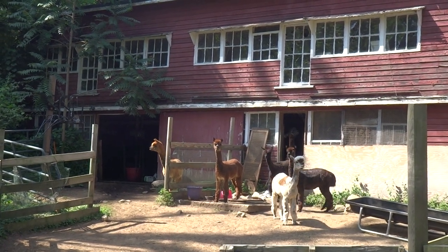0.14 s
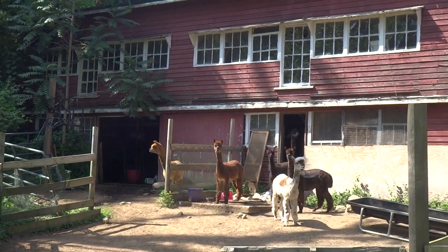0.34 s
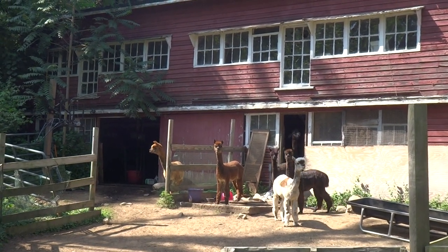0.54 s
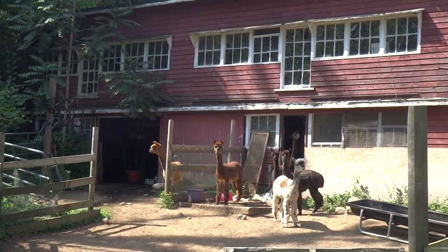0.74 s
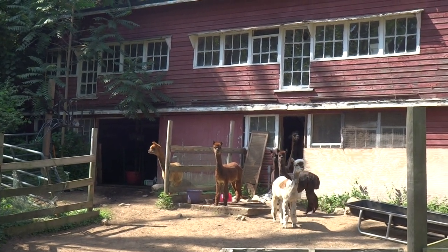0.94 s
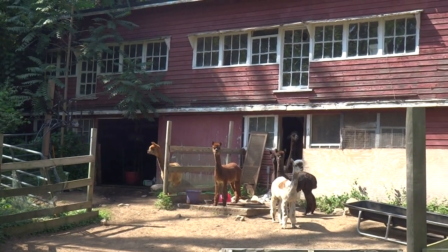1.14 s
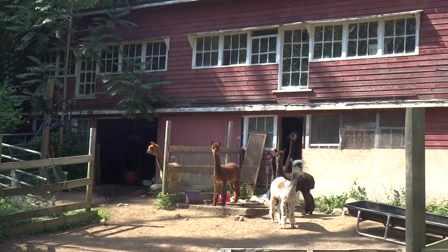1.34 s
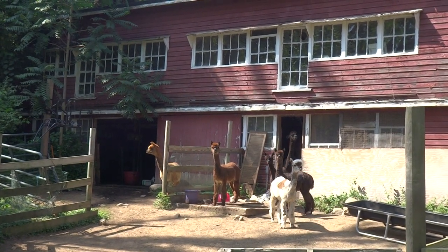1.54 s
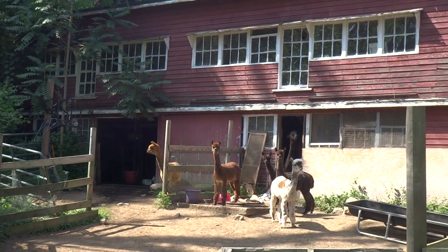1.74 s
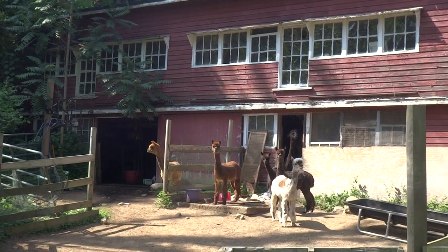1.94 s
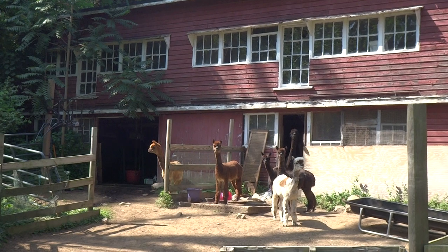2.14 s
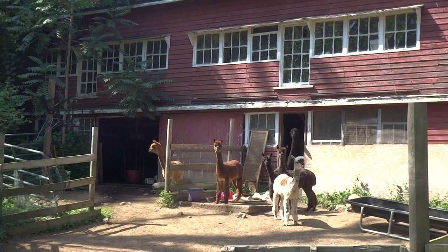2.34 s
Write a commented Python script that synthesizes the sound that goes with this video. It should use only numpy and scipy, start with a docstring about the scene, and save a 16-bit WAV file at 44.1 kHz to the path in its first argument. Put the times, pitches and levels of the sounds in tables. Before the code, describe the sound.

An alpaca's alarm calls start after a faint squeal at 0 seconds. Harsh whistling honks, each about a tenth of a second, come near 0.2, 0.4, 0.65, 0.9, 1.15, 1.4 and 1.7; the 0.4 one is broken, raspy and clicking. Thin higher squeals fill most gaps. From 1.7 the honks weaken, with low buzzy ones at 1.9 and 2.25. Barn echoes, faint insect hiss and distant machinery hum continue throughout.

```python
"""An alpaca gives alarm calls four times a second in a yard walled by a barn. Each honk is a low harmonic buzz
of the vocal folds; most add a shrill whistle that the buzz modulates into sidebands, with pulsed breath noise.
Hard closures of the folds click in the throat, and a thin clean squeal sounds between the honks. The walls echo
it all by convolution over filtered-noise insects, far machinery and rumble, heard by two close microphone ports."""
import sys
import numpy as np
from scipy import signal
from scipy.fft import rfft, irfft
from scipy.io import wavfile
from scipy.ndimage import uniform_filter1d

SR = 44100
rng = np.random.default_rng(int(sys.argv[2]) if len(sys.argv) > 2 else 0)


def invert_db(level):
    """Linear amplitude ratio for a level in decibels (20 dB per decade), elementwise."""
    return 10 ** (np.asarray(level, dtype=float) / 20)


def file_out(sig):
    """Save sig as 16-bit WAV at sys.argv[1]."""
    # one column per channel
    cols = np.atleast_2d(sig).T
    # limit, then scale
    lim = np.clip(cols, -1, 1)
    pcm = np.round(lim * 32767).astype(np.int16)
    wavfile.write(sys.argv[1], SR, pcm)


N = 105840

# Honks: start t/s, length t/s, buzz level/dB, top pitch f/Hz, roughness [0-1], extra level of the lowest tone/dB
HONKS = [(.175, .155, -39.5, 431.1, 0.23, -1), (.395, 0.13, -35, 410.2, .75, 4.5),
         (.645, 0.13, -40, 426.5, 0.25, -0.5), (.895, 0.095, -38.5, 420.6, 0.21, -2),
         (1.145, 0.1, -38.5, 422.5, 0.01, -1), (1.42, 0.094, -37.5, 414.1, 0.19, 0.5),
         (1.7, 0.12, -38, 396.8, 0.2, 3.5), (1.89, 0.12, -38, 390, 0.29, -3),
         (2.235, 0.13, -39, 383, 0.23, -0.5)]
# Throat resonance on the buzz: f/Hz, relative level/dB
HONK_THROAT = [(390, -6), (780, -6.5), (1170, -8.5), (1550, -11.5), (1940, 5), (2330, -2), (2720, 1),
               (3500, -4.5), (4300, -10), (5100, -6.5), (5800, -46.5)]
# Whistle path, one list per whistling honk: t/s, pitch f/Hz, level/dB, brightness tilt/dB
WHISTLES = [
    [(.196, 1800, -30, 1), (.204, 1820, -23, -2), (.225, 1837, -17, 1), (.245, 1904, -21, 3.5),
     (.28, 1898, -19, 1), (.3, 1877, -18.5, 2.5), (.312, 1894, -57, 11)],
    [(.41, 1728, -39.5, -22.5), (.418, 1769, -28, 3.5), (.43, 1813, -47.5, 25.5), (.442, 1797, -32.5, 16),
     (.455, 1832, -28.5, 9), (.47, 1759, -34.5, -10.5), (.48, 1800, -41, -17), (.496, 1902, -31, -11.5),
     (.512, 1879, -38.5, -18.5), (.525, 1898, -64, -14.5)],
    [(.659, 1800, -35, 4), (.668, 1813, -18, 2), (.684, 1848, -15, -3.5), (.694, 1852, -20.5, 4),
     (.708, 1867, -20.5, 9.5), (.728, 1909, -18.5, -6), (.74, 1880, -28.5, 18)],
    [(.907, 1793, -27, 1), (.916, 1820, -18.5, 1.5), (.935, 1826, -15.5, -2), (.958, 1843, -20.5, 6.5),
     (.985, 1878, -27, 2)],
    [(1.162, 1800, -31.5, 5), (1.17, 1811, -17.5, 0), (1.19, 1818, -18.5, 0), (1.208, 1816, -18, 0.5),
     (1.213, 1843, -19, 1), (1.23, 1815, -53, 14)],
    [(1.436, 1800, -21, 2), (1.442, 1800, -29.5, -0.5), (1.46, 1800, -18.5, 2.5), (1.484, 1776, -28.5, -1)],
    [(1.73, 1779, -58, -13), (1.748, 1773, -31, -4.5), (1.765, 1777, -46, -6)],
]
# Modulation products: rows = multiples 1-4 of the whistle, columns = multiples -1..3 of the buzz [relative level/dB]
SIDEBANDS_DB = [(-24.5, -3.5, -10, -19, -16.5), (-51, -3, -6, -15, -18), (-19.5, -13.5, -15.5, -18.5, -25),
                (-61, -23.5, -29, -29.5, -47)]
# Breath noise spectrum: f/Hz, relative level/dB
BREATH_SPECTRUM = [(400, -11), (1200, -11), (1900, -3.5), (2800, 2.5), (3800, 3.5), (5400, 5), (7500, -15),
                   (9000, -13), (14500, -39.5)]
# Hard closures of the folds: t/s, peak level/dB, ring f/Hz
CATCHES = [(.4215, -22, 3700), (.4422, -13.5, 5400), (.469, -17, 3601), (.4947, -12, 4000),
           (.4995, -19.5, 4080), (1.7432, -25, 2600), (1.748, -18, 3600)]
# Squeals: start t/s, length t/s, level/dB, top pitch f/Hz, share of pitch lost at the start,
# extra level of the harmonics above the second/dB
SQUEALS = [(0.0, 0.165, -50, 602.7, .36, 3.5), (0.563, 0.094, -35, 545.4, 0.086, -30),
           (.8, 0.091, -31, 544.3, 0.0968, -17), (1.034, .08, -29, 555, 0.1017, -17.5),
           (1.271, 0.11, -38, 581.6, 0.0755, -5.5), (1.553, 0.13, -39.5, 592, 0.11, -2.5),
           (2.057, 0.13, -37, 607, 0.12, 1.5)]
# Throat resonance on the squeal: f/Hz, level/dB
SQUEAL_THROAT = [(600, -22.5), (1150, -18.5), (1800, -10), (2350, -17), (2700, -0.5), (3050, 2), (3600, -4),
                 (4200, -6), (4800, -9), (5400, -35)]
# Reflections from ground and barn walls: delay t/s, level/dB
ECHOES = [(0.01, -11.5), (0.025, -7), (0.046, -16)]
# Reverberant tail of the yard by band: centre f/Hz, t60/s, relative level/dB
YARD_TAIL = [(540, 3, -8), (1800, 2.2, -10), (3100, 1.7, -11.5), (6030, 0.6, -7.5), (9000, 0.38, -29)]
# Rumble and hiss spectrum: f/Hz, relative level/dB
AIR_SPECTRUM = [(22, -39), (40, -5.5), (55, -10), (120, -4), (170, -8), (300, -14), (600, -8.5),
                (1200, -15), (2000, -31.5), (3200, -23), (5000, -26), (8000, -13.5), (12000, -36),
                (15500, -52)]
# Insect song bands: centre f/Hz, width f/Hz, level/dB, flicker/dB
INSECTS = [(7810, 380, -52, 1), (10230, 630, -55.5, -1.5), (13900, 3000, -64, -3.5)]
# Far machinery: centre f/Hz, width f/Hz, level/dB
HUM = [(108.6, 5.5, -66.5), (133.9, 5.8, -61.5), (1080, 42, -59.5)]
# Gain of the part unlike at the ports, before each port's weight: f/Hz, level/dB
APART_DB = [(25, -24), (125, -13), (500, -13), (1000, -20), (8000, -13), (12000, -24)]
# Phase tilt between the ports, before halving and each port's weight: f/Hz, phase/rad
PORT_PHASE = [(60, 0.34), (125, -0.31), (340, -1.08), (950, -1.42), (2000, -0.97), (4650, -0.57),
              (15000, 0.66)]
# Level tilt between the ports, before halving and each port's weight: f/Hz, level/dB
PORT_DB = [(60, .2), (2000, -0.65), (8000, -0.2)]


def unit(x):
    """Normalisation: scale to rms 1."""
    return x / np.sqrt(np.mean(x ** 2))


def at(table, hz):
    """Interpolation of (f/Hz, value) points on a logarithmic frequency axis."""
    table = np.array(table, float)
    return np.interp(np.log(np.maximum(hz, 1)), np.log(table[:, 0]), table[:, 1])


def shaped(x, gain):
    """Linear filtering: multiply the spectrum by gain(f/Hz)."""
    spectrum = rfft(x) * gain(np.fft.rfftfreq(x.shape[-1], 1 / SR))
    return irfft(spectrum, x.shape[-1])


def bump(hz, centre_hz, width_hz):
    """Gaussian band-pass response."""
    return np.exp(-2 * ((hz - centre_hz) / width_hz) ** 2)


def walk(hz):
    """Low-passed noise: a random wander up to about hz, of rms 1."""
    return unit(shaped(rng.standard_normal(N), lambda f: bump(f, 0, hz)))


def column(rows, index):
    """Sample and hold: one value per call, kept until the next call starts."""
    starts = [row[0] for row in rows]
    call = np.searchsorted(starts, np.arange(N) / SR) - 1
    return np.array([row[index] for row in rows])[np.clip(call, 0, None)]


def arches(rows, rise, sag, top, edge_s):
    """Frequency and amplitude envelopes: pitch arches over each call; level rises, holds and falls."""
    t = np.arange(N) / SR
    hz = np.full(N, 1. * rows[0][3])
    gain = np.zeros(N)
    for row, lost in zip(rows, rise):
        start, length, db, pitch = row[:4]
        u = (t - start) / length  # place within the call, 0 to 1
        on = (u >= 0) & (u <= 1)
        bend_up = lost * ((top - u) / top) ** 2.2
        bend_down = sag * ((u - top) / (1 - top)) ** 2.5
        hz[on] = pitch * (1 - np.where(u < top, bend_up, bend_down)[on])
        to_edge_s = np.minimum(u, 1 - u)[on] * length
        gain[on] = invert_db(db) * np.sin(np.pi / 2 * np.clip(to_edge_s / edge_s, 0, 1)) ** 2
    return hz, gain


def fold_buzz(hz, phase):
    """Source-filter principle: harmonics of the vocal folds weighted by the throat, each flickering."""
    lowest_db = column(HONKS, index=5)
    low = np.zeros(N)
    for k in range(1, 16):
        level_db = at(HONK_THROAT, k * hz) + 1.5 * walk(25) + lowest_db * (k == 1)
        low += invert_db(level_db) * np.sin(k * phase)
    return unit(low)


def whistle_path():
    """Frequency and amplitude modulation: pitch, gain and brightness follow each whistle's points."""
    t = np.arange(N) / SR
    hz, gain, bright_db = np.full(N, 1800.), np.zeros(N), np.zeros(N)
    for call in map(np.array, WHISTLES):
        on = (t >= call[0, 0]) & (t <= call[-1, 0])
        hz[on] = np.interp(t[on], call[:, 0], call[:, 1])
        gain[on] = invert_db(np.interp(t[on], call[:, 0], call[:, 2]))
        bright_db[on] = np.interp(t[on], call[:, 0], call[:, 3])
    return hz, uniform_filter1d(gain, size=60), bright_db


def whistle(hz, bright_db, rough, buzz):
    """Intermodulation: the buzz chops the whistle, giving sum and difference tones."""
    break_db = 8  # how far the tones cut in and out at full roughness
    pipe = 2 * np.pi * np.cumsum(hz * (1 + 0.0207 * rough * walk(164))) / SR
    shrill = np.zeros(N)
    for m, row in enumerate(SIDEBANDS_DB):
        tilt_db = min(m - 1, 1) * bright_db  # sign: minus on the first multiple, plus on the third and fourth
        for k, db in enumerate(row):
            level_db = db + tilt_db + break_db * rough * walk(52.0)
            shrill += invert_db(level_db) * np.sin((m + 1) * pipe + (k - 1) * buzz + 0.19 * k * k)
    return unit(shrill)


def breath_noise(puff, rough):
    """Turbulence: pulsed noise in bands that cut in and out as the voice roughens."""
    patchy_db = 7  # at full roughness
    rasp = np.zeros(N)
    for centre_hz in 700 * 1.4 ** np.arange(10):
        band = shaped(puff, lambda f: invert_db(at(BREATH_SPECTRUM, f)) * bump(f, centre_hz, 0.36 * centre_hz))
        rasp += invert_db(patchy_db * rough * walk(31)) * band
    return unit(rasp)


def honks():
    """Modulation: the fold buzz modulates a whistle of its own pitch and gates the breath."""
    pitch_lost = [.15] * len(HONKS)  # share lost at the start
    hz, gain = arches(HONKS, pitch_lost, sag=.12, top=.45, edge_s=0.01)
    rough = np.clip(column(HONKS, index=4), 0, 1)
    clear = np.sqrt(1 - rough ** 2)
    buzz = 2 * np.pi * np.cumsum(hz * (1 + 0.0522 * rough * walk(216))) / SR
    low = fold_buzz(hz, buzz)
    high_hz, high, bright_db = whistle_path()
    shrill = whistle(high_hz, bright_db, rough, buzz)
    # One puff of breath per fold cycle; 1.5 sets how sharply it is gated
    puff = np.exp(1.5 * np.cos(buzz - 1)) * rng.standard_normal(N)
    rasp = breath_noise(puff, rough)
    # A rough honk rattles low in the throat
    rattle = unit(shaped(puff, lambda f: bump(f, 600, 1700) * (f > 300)))
    growl = invert_db(-3) * rough ** 3 * rattle
    # The buzz rings near 4310 Hz when the whistle sounds
    pressed = sum(bump(k * hz, 4310, 770) * np.sin(k * buzz + k * k) for k in range(7, 13))
    tones = clear * (shrill + invert_db(-11.5) * pressed)
    hiss = (invert_db(-17) + 0.35 * rough ** 3.3) * invert_db(bright_db) * rasp
    return gain * (clear * low + invert_db(-4) * rasp) + high * (tones + hiss + growl)


def catches():
    """Impulse response of a resonator: each hard closure rings and decays in the throat."""
    t = np.arange(N) / SR
    ring_s = .0008  # decay time constant
    out = np.zeros(N)
    for start, db, hz in CATCHES:
        decay = (t >= start) * np.exp(-np.abs(t - start) / ring_s)
        out += invert_db(db) * decay * np.sin(2 * np.pi * hz * (t - start))
    return out


def squeals():
    """Additive harmonic synthesis: a clean stack on an arched pitch, with a little breath noise."""
    pitch_lost = [row[4] for row in SQUEALS]
    hz, gain = arches(SQUEALS, pitch_lost, sag=0.11, top=.5, edge_s=.032)
    phase = 2 * np.pi * np.cumsum(hz * (1 + 0.0976 * .04 * walk(118))) / SR  # slight pitch jitter
    bright_db = column(SQUEALS, index=5)
    stack = np.zeros(N)
    for n in range(1, 12):
        level_db = at(SQUEAL_THROAT, n * hz) + 1.5 * walk(28) + bright_db * (n > 2)
        stack += invert_db(level_db) * np.sin(n * phase + .5 * n * n)
    breath = unit(shaped(rng.standard_normal(N), lambda f: bump(f, 3340, 2700)))
    breath_gate = uniform_filter1d(1. * (gain > 0), size=900)
    return invert_db(-53) * breath_gate * breath + gain * stack


def yard(x):
    """Convolution reverberation: direct sound, smeared echoes, tail by band; row 1 is unlike at the ports."""
    t = np.arange(SR) / SR
    ir = np.zeros((2, SR))
    ir[0, 0] = 1
    for delay, db in ECHOES:
        smear = rng.standard_normal(SR) * np.exp(-np.abs(t - delay) / 0.00053)
        ir[0] += invert_db(db) * smear / np.sqrt(np.sum(smear ** 2))
    for hz, t60, db in YARD_TAIL:
        fall = np.clip(t / 0.11, 0, 1) * invert_db(-60 * t / t60)  # builds up over 0.11 s
        band = shaped(rng.standard_normal((2, SR)), lambda f: bump(f, hz, 0.56 * hz))
        ir += invert_db(db) * band * fall / np.sqrt(np.sum(fall ** 2))
    return signal.fftconvolve(x[None], ir, axes=1)[:, :N]


def background():
    """Band-filtered noise: rumble and hiss that swell a little, insects in high bands, far machinery."""
    air = unit(shaped(rng.standard_normal((2, N)), lambda f: invert_db(at(AIR_SPECTRUM, f))))
    out = air * invert_db(-49.5 + 1. * walk(1))
    for hz, width_hz, db, flicker_db in INSECTS:
        song = unit(shaped(rng.standard_normal((2, N)), lambda f: bump(f, hz, width_hz)))
        out = out + song * invert_db(db + flicker_db * walk(31))
    for hz, width_hz, db in HUM:
        drone = unit(shaped(rng.standard_normal((2, N)), lambda f: bump(f, hz, width_hz)))
        out = out + invert_db(db) * drone
    return out


def port(same, apart, side):
    """Inter-channel differences: signed weight side tilts level and phase and adds the unlike part."""
    def response(f):
        return invert_db(side * at(PORT_DB, f) / 2) * np.exp(.5j * side * at(PORT_PHASE, f))
    return shaped(same + side * apart, response)


def scene():
    """Superposition: voices in the yard over the background, spread on the two ports."""
    same, apart = yard(honks() + squeals() + catches()) + background()
    apart = shaped(apart, lambda f: invert_db(at(APART_DB, f)))
    return np.array([port(same, apart, 1), port(same, apart, -1.36)])


def low_pass(x):
    """Removes everything above the highest recorded frequency."""
    return signal.sosfilt(signal.butter(12, 15750, fs=SR, output="sos"), x)


def record(dry):
    """Capture: the finished two-port mix, with no further gain."""
    return low_pass(dry)


dry = scene()
out = record(dry)
file_out(out)
```